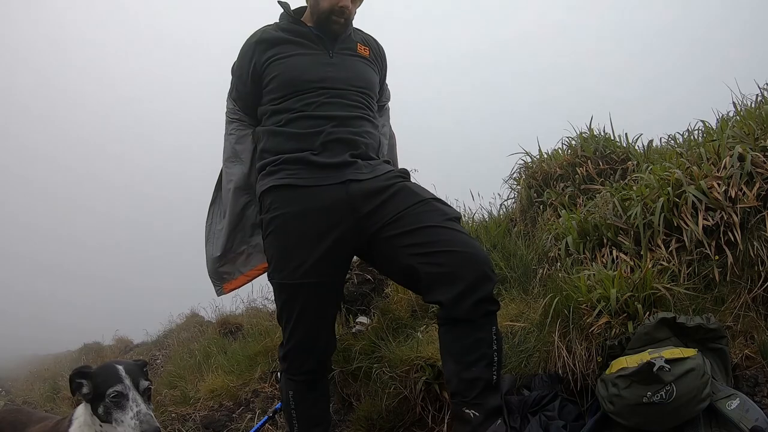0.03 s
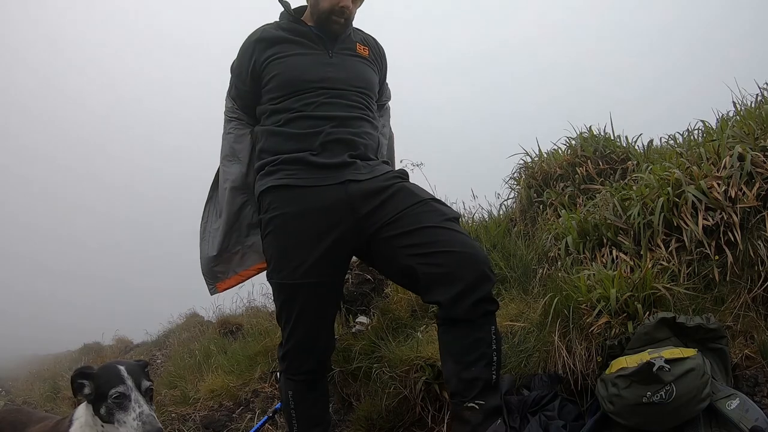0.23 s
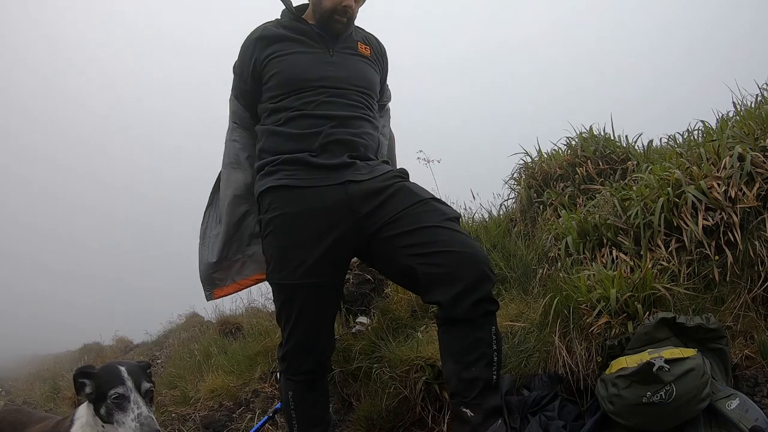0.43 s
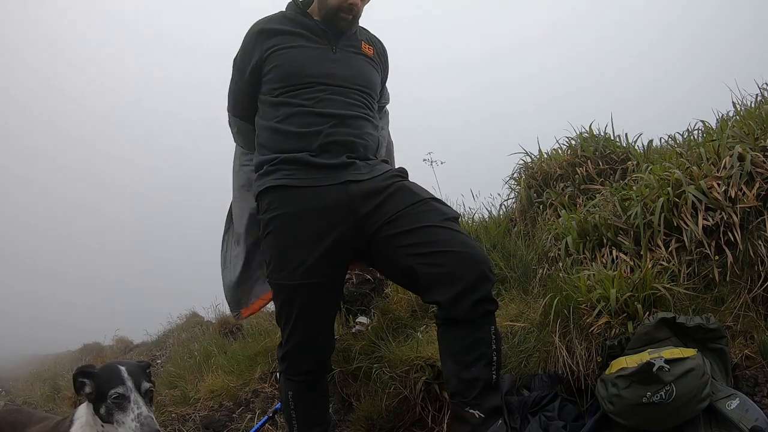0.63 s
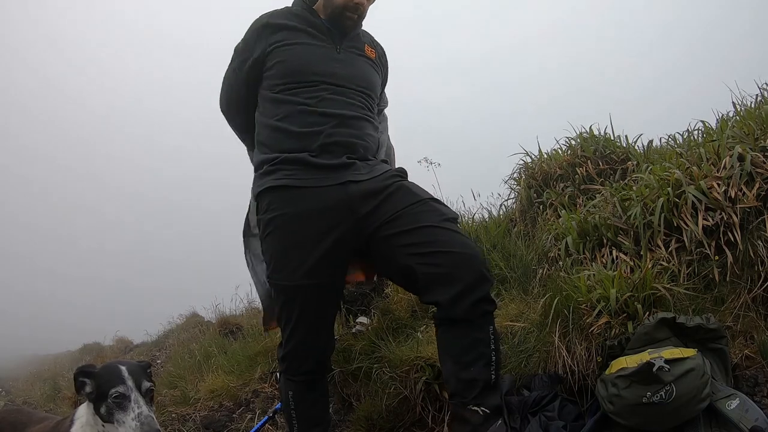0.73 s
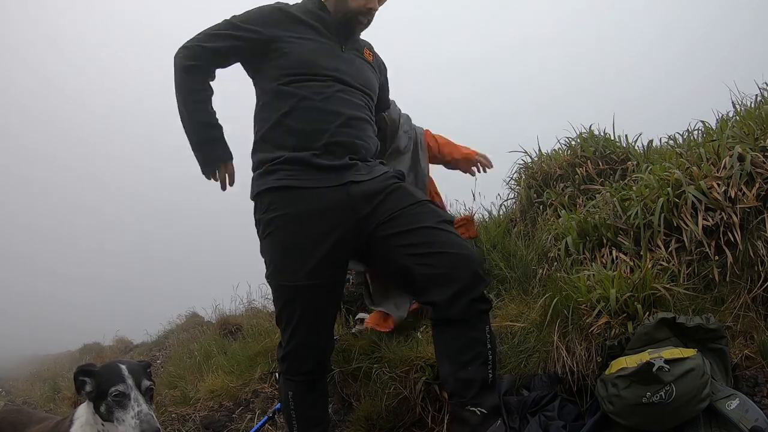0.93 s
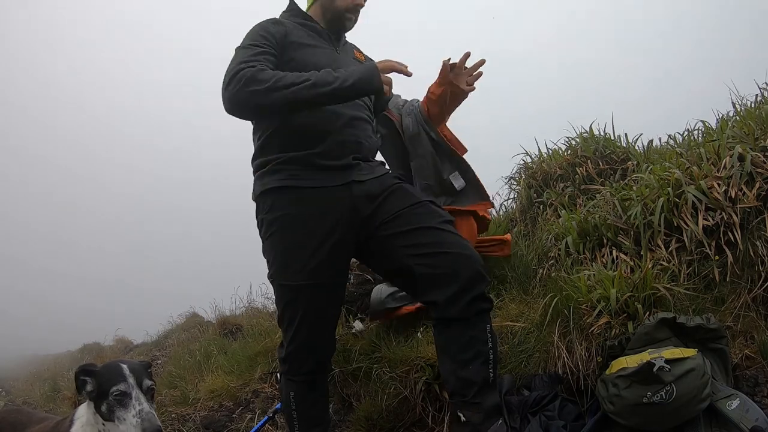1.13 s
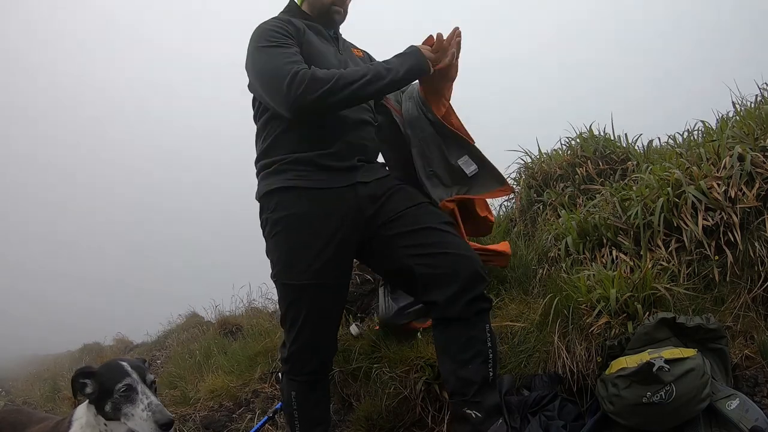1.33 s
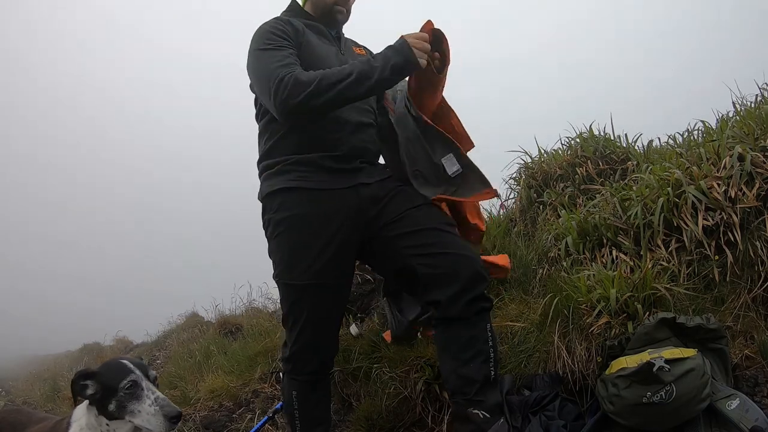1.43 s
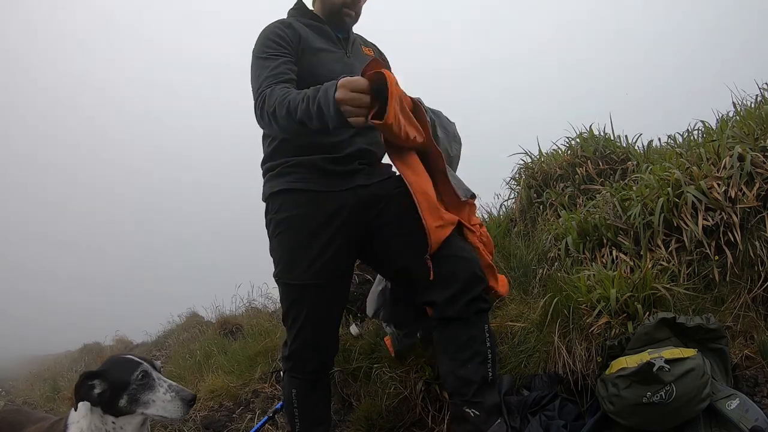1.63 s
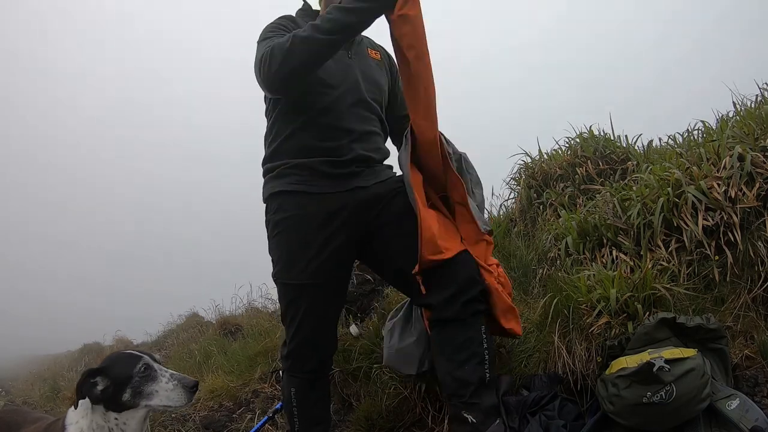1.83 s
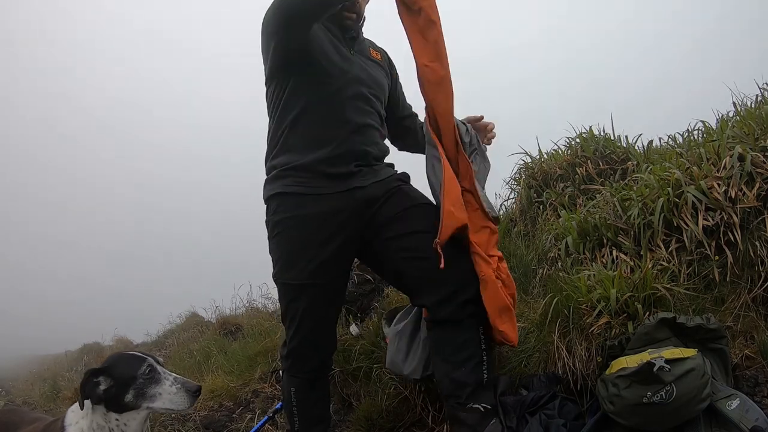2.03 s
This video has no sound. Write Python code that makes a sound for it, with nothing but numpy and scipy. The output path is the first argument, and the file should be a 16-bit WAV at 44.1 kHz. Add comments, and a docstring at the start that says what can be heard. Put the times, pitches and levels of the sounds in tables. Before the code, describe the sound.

A thin waterproof jacket is pulled off on an open hillside. Until 0.5 s there is mostly low wind thudding, stronger on the left, with faint fabric ticks. Rustling grows from 0.5 s to a sharp, bright snap at about 1.07 s, eases around 1.3 s, then crisp crinkles and sliding hiss surge at 1.5-1.75 s and 1.9-2.0 s. Faint steady wind lies beneath.

```python
"""On a windy hillside, a thin waterproof jacket is pulled off the arms.
Dense tiny clicks, given a tone colour, make the stiff fabric crinkle as it folds;
finer ones merge into the hiss of fabric sliding over the sleeves, and short rings make the snaps.
Low noise makes gusts that buffet two microphone ports, mostly the left one harder.
Steadier noise is the far wind in the grass."""
import sys
import numpy as np
from scipy import signal
from scipy.fft import rfft, irfft
from scipy.io import wavfile
from scipy.ndimage import uniform_filter1d

SR = 44100
rng = np.random.default_rng(int(sys.argv[2]) if len(sys.argv) > 2 else 0)


def inscribe(sig):
    """Save sig as 16-bit PCM at rate SR to the path in sys.argv[1].

    A 1-D sig is mono; a 2-D sig holds one channel per row.
    Samples are clipped to [-1, 1] before scaling.
    """
    pcm = np.round(np.clip(np.atleast_2d(sig).T, -1, 1) * 32767)
    wavfile.write(sys.argv[1], SR, pcm.astype(np.int16))


N = 91992   # length in samples, about 2.1 s


def from_db(db):
    """Turn a level in dB into a gain."""
    return 10 ** (np.asarray(db) / 20)


def rms_one(x):
    """Scale a sound so that its rms (average strength) is 1."""
    return x / np.sqrt(np.mean(x ** 2) + 1e-20)


def in_time(rows):
    """Glide between the rows of a table: one value per sample for each column after the time."""
    start_s, *columns = np.transpose(rows)
    time_s = np.arange(N) / SR
    return [np.interp(time_s, start_s, column) for column in columns]


def at_hz(points, edge_fall):
    """Glide between points on a log frequency scale; edge_fall is the drop per factor e outside them."""
    log_hz = np.log(np.arange(N // 2 + 1) * SR / N + 1)   # the 1 avoids the log of zero
    point_hz, value = np.transpose(points)
    log_point = np.log(point_hz)
    below = np.maximum(log_point[0] - log_hz, 0)
    above = np.maximum(log_hz - log_point[-1], 0)
    return np.interp(log_hz, log_point, value) - edge_fall * (below + above)


def coloured(x, colour):
    """Shape the spectrum with a colour table, then set the rms to 1."""
    gain = from_db(at_hz(colour, edge_fall=60))
    return rms_one(irfft(rfft(x) * gain, N))


def drift(hz):
    """Slow random wandering of rms 1: noise through two equal smoothing steps."""
    pole = np.exp(-2 * np.pi * hz / SR)
    noise = rng.standard_normal(N + SR)
    smooth = signal.lfilter([1], [1, -2 * pole, pole * pole], noise)
    return rms_one(smooth[SR:])   # skip the first second, while the filter settles


def panned(db):
    """Left and right gains; a positive difference makes the left louder."""
    return from_db([db / 2, -db / 2])


# How alike the fabric sounds at the two ports: pitch_hz, likeness (0 unrelated, 1 identical)
PORT_LIKENESS = [(60, 0.2), (110, 0.43), (200, 1), (380, 0.89), (700, 0.77), (1290, 0.59), (2380, 0.92),
                 (4400, 0.87), (8120, 0.27), (15000, 0.43)]


def grains(per_s, spread_db, clump_db):
    """Fabric moves in tiny clicks of uneven size, in clumps, partly alike at the two ports."""
    born = rng.random((2, N)) < per_s / SR
    extra_db = spread_db * np.minimum(rng.exponential(1, (2, N)), 5)
    sizes = from_db(extra_db + clump_db * drift(50.0))
    signs = rng.choice([-1, 1], (2, N))
    mid, side = rfft(born * sizes * signs)
    alike = at_hz(PORT_LIKENESS, edge_fall=0)
    # mid is the same at both ports, side is opposite
    both = np.sqrt(1 + alike) * mid + np.sqrt(1 - alike) * side * [[1], [-1]]
    return irfft(both, N)


# Folding of the fabric: start_s, level_db (of the main crinkle), deep_db and middle_db (deep and
# middle folds against the main crinkle), left_over_right_db
CRINKLE_MOVES = [(0.0, -68.5, 2, 2, 6), (0.06, -79.5, 11.5, 8, 2), (0.1, -62, 3, 2.5, 1),
                 (0.3, -78, 0.5, 6, 5.5), (0.43, -70, -2, 5, 6.5), (0.48, -57.5, 0, 1.5, 3),
                 (0.71, -54, -8.5, -3.5, 3.5), (0.75, -51, -17.5, -6.5, 4), (0.89, -58, 7.5, 3, 0.5),
                 (0.98, -49.5, -4.5, -5.5, -1.5), (1.06, -48.5, -8, 1, 0), (1.07, -35, -12, -11.5, -3),
                 (1.1, -50, -3.5, -3.5, -1.0), (1.29, -59.5, -9.5, -5, -1.5), (1.36, -60.5, -4, -2, 0),
                 (1.39, -51, -13, -11, 0.0), (1.41, -53, -5, -5, 1), (1.43, -57, -9, -2, -0.5),
                 (1.5, -46, -5, -5, 0), (1.52, -44.5, -11, -2.5, 4), (1.53, -45.5, -6, -4, -0.5),
                 (1.65, -43.5, -14, -6.5, 0.0), (1.71, -42.5, -3.5, -7.5, 0.0), (1.72, -49.5, -10, 1, 1),
                 (1.73, -43.5, 6.5, 2, 1), (1.73, -47.5, -13, -0.5, -1.0), (1.77, -52, 1, -2.5, -0.5),
                 (1.84, -53, -7.5, 3, 0.5), (1.89, -41, -7, -5, 0), (1.95, -45.5, -8.5, -2.5, -0.5),
                 (2.0, -44, -11, -5, -1.5), (2.09, -58, -2, -0.5, -2)]
# Tone of the main crinkle, the middle folds and the deep folds: pitch_hz, relative_level_db
CRINKLE_TONE = [(2200, -7.5), (2700, -1.5), (3300, 0.5), (3800, -3.5), (4500, -7), (5200, -8.5)]
MIDDLE_FOLD_TONE = [(900, -1.5), (1400, 5.5), (2200, 0.5)]
DEEP_FOLD_TONE = [(200, 4.5), (400, -1), (700, 0.5), (1000, -3)]


def crinkle():
    """Creases buckle in a dense patter; larger folds sound lower."""
    level_db, deep_db, middle_db, pan_db = in_time(CRINKLE_MOVES)
    patter = grains(per_s=4000, spread_db=1.5, clump_db=0.8)
    deep_patter = grains(per_s=1500, spread_db=2.16, clump_db=1.07)
    folds = coloured(patter, CRINKLE_TONE)
    folds = folds + from_db(middle_db) * coloured(patter, MIDDLE_FOLD_TONE)
    folds = folds + from_db(deep_db) * coloured(deep_patter, DEEP_FOLD_TONE)
    return from_db(level_db) * panned(pan_db) * folds


# Fabric sliding on fabric: start_s, level_db (of the main hiss), top_db (top treble against it)
SLIDE_MOVES = [(0.0, -78, -8.5), (0.02, -84, -15), (0.12, -73.5, -13), (0.25, -85.5, -12), (0.44, -77, -15),
               (0.52, -62.5, -15), (0.71, -63, -10), (0.76, -57, -12.5), (0.85, -68.5, -5.5),
               (0.92, -64.5, -2.5), (1.03, -55.5, -6), (1.07, -44, -10.5), (1.1, -58.5, -6.5),
               (1.18, -58, -5.5), (1.19, -69.5, 5), (1.25, -59, -11), (1.28, -68, -4), (1.35, -68, -11),
               (1.42, -51, -8), (1.43, -60.5, -8), (1.47, -55, -4), (1.5, -47, -3.5), (1.69, -47.5, -2),
               (1.76, -57.5, -2.5), (1.84, -59.5, -12), (1.87, -51, -6.5), (1.96, -47, -7),
               (2.07, -65, -4.5), (2.09, -64, -9)]
# Tone of the main hiss and of the top treble: pitch_hz, relative_level_db
SLIDE_TONE = [(2650, -24), (4500, -1.5), (5220, -7), (5670, 3), (7110, 3.5), (7910, 0), (8600, -22),
              (11200, -21), (18900, -120)]
TOP_TONE = [(4880, -34), (8300, -6), (8700, -5.5), (12300, -11.5), (14500, -19.5), (15400, -4)]


def slide():
    """The weave rubs along the sleeve: very fine grains merge into a hiss."""
    level_db, top_db = in_time(SLIDE_MOVES)
    rub = grains(per_s=9000, spread_db=1.0, clump_db=0.5)
    hiss = coloured(rub, SLIDE_TONE)
    top = from_db(top_db) * coloured(rub, TOP_TONE)
    return from_db(level_db) * (hiss + top)


def eddies(colour):
    """Low turbulence, partly shared by the ports; its own swells are partly evened so the gusts lead."""
    likeness, evenness, even_over_s = 0.41, 0.52, 0.028   # likeness and evenness run from 0 to 1
    shared = rng.standard_normal(N)
    own = rng.standard_normal((2, N))
    rumble = coloured(np.sqrt(likeness) * shared + np.sqrt(1 - likeness) * own, colour)
    span = int(even_over_s * SR)
    power = uniform_filter1d(uniform_filter1d(rumble ** 2, span), span)
    power = power + 0.024   # keeps quiet moments from being raised too far
    return rms_one(rumble / power ** (evenness / 2))


# Gusts at the ports: start_s, deep_db (deep rumble, before the overall trim), upper_db (upper rumble
# against the deep one), left_over_right_db
GUST_MOVES = [(0.0, -45.5, -4, 7.5), (0.03, -39, -8, 16.5), (0.14, -36.5, 2.5, 12.5), (0.21, -33, -4, 5),
              (0.24, -33, -8.5, 10.5), (0.29, -29.5, -8, 4.5), (0.32, -49.5, 14.5, 9), (0.35, -42, -3, 0),
              (0.38, -35.5, -10.5, 11), (0.41, -34, -6, 4), (0.45, -37.5, -20.5, 14), (0.5, -61, 3, 1),
              (0.53, -58, -10, -1), (0.64, -58.5, -9, 7), (0.7, -37.5, -24.5, 5), (0.74, -44, -28, 12),
              (0.78, -65, -10, 1), (0.83, -69, -8, -3), (0.89, -35, -0.5, 10), (0.95, -41, -4, 9),
              (0.99, -49, -12, 9.0), (1.02, -40, -20, -6), (1.05, -32.5, -24, 3), (1.08, -40, 1, 5),
              (1.12, -38, -8.5, 9.5), (1.16, -38.5, -6, 0), (1.19, -37, -15, 4), (1.22, -53, 0.5, 7),
              (1.26, -55, -10, -4), (1.29, -52, -4, 13), (1.35, -37, -15, 7.0), (1.37, -55.5, -0.5, 7.5),
              (1.42, -32.5, -11.5, 13), (1.48, -46, -5, 16), (1.5, -53, 9, 6), (1.57, -47, -20, 0),
              (1.68, -77, 1, 7), (1.73, -50, -17, 13), (1.8, -59, -17, 1), (1.85, -53.5, -5, 13),
              (1.95, -58, -6, 1), (1.98, -49, -13.5, 17), (2.04, -45, 11, 11.5), (2.09, -44, -11, 19)]
# Tone of the deep and of the upper rumble: pitch_hz, relative_level_db
DEEP_RUMBLE_TONE = [(15, -4), (45, 2), (70, -12), (90, -37.5)]
UPPER_RUMBLE_TONE = [(55, -6.5), (75, 0), (120, -5), (190, -17), (260, -31)]


def gusts():
    """Wind buffets the ports as turbulence: a deep and an upper rumble."""
    deep_db, upper_db, pan_db = in_time(GUST_MOVES)
    trim_db = -1.0
    rumble = eddies(DEEP_RUMBLE_TONE) + from_db(upper_db) * eddies(UPPER_RUMBLE_TONE)
    return from_db(deep_db + trim_db) * panned(pan_db) * rumble


# Tone of the far wind in the grass: pitch_hz, relative_level_db
AIR_TONE = [(125, -29), (150, 2), (185, 4), (250, -5.5), (700, -16), (1500, -10.5), (2500, -18),
            (5000, -30), (9000, -32), (13000, -68)]


def air():
    """Far wind in the grass: a wash of noise, partly shared by the ports, whose level wanders a little."""
    shared = rng.standard_normal(N)
    own = rng.standard_normal((2, N))
    level_db = -58.5 + 1.1 * drift(2.4)
    return from_db(level_db) * coloured(0.6 * shared + own, AIR_TONE)


# Single creases snapping: start_s, level_db, pitch_hz, ring_cycles (under 2 counts as 2),
# left_over_right_db
SNAP_EVENTS = [(0.0677, -44, 1170, 7.1, 5), (.090, -40, 520, 4.7, 1), (0.408, -44.5, 1440, 6.5, 8),
               (.675, -46, 800, 5, 3), (.725, -39, 1860, 7, 3), (0.985, -32.5, 2130, 4, 3),
               (1.031, -39, 2200, 5.1, 1), (1.047, -31, 3500, 3.6, -5), (1.0615, -24, 2830, 3.5, -2),
               (1.071, -33, 2620, 2.7, -1), (1.0728, -17, 3000, 2.7, 1), (1.0758, -25.5, 3050, 6.6, -1),
               (1.078, -45, 3160, 2.5, -2), (1.082, -30, 2960, 18, -1), (1.172, -40, 1720, 8.1, 0),
               (1.2546, -35.5, 1570, 6.6, -3.5), (1.368, -29.5, 1400, 3, -4), (1.387, -33, 2300, 4.3, 3),
               (1.480, -32.5, 1610, 2.6, 0), (1.755, -31, 2500, 3, 0), (1.414, -43.5, 720, 4, 0),
               (1.515, -24.5, 2580, 5.6, -2), (1.7241, -24, 1410, 3.4, -1), (1.7292, -32, 3000, 6.9, 2),
               (1.8105, -30, 2050, 2.9, 2), (1.813, -36, 1300, 3.4, 4), (1.841, -29, 2100, 1.8, 0),
               (1.848, -35, 2400, 3.6, -6), (1.8568, -31, 1180, 4.3, 2), (1.882, -19.5, 2340, 1.3, 2.5),
               (1.988, -31.5, 990, 3.8, -4), (2.015, -30.5, 1290, 4.6, 0)]


def snaps():
    """Each crease rings for a few cycles that swell at once and die, with a short rough crack."""
    length = 900   # samples per snap, about 20 ms
    crack_decay_s, crack_db = 0.0052, -17.5
    out = np.zeros((2, N + length))
    t = np.arange(length) / SR
    crack_band = signal.butter(2, [700, 6000], "band", fs=SR, output="sos")
    for start_s, level_db, pitch_hz, ring_cycles, pan_db in SNAP_EVENTS:
        noise = rng.standard_normal(length)
        crack = signal.sosfilt(crack_band, noise) * np.exp(-t / crack_decay_s)
        # the ring has almost gone at age 9.14, after ring_cycles cycles
        age = t * pitch_hz * 9.14 / max(ring_cycles, 2)
        swell = 1.43 * age ** 2 * np.exp(-age)
        ring = swell * np.sin(2 * np.pi * pitch_hz * t)
        snap = ring + from_db(crack_db) * crack
        i = int(start_s * SR)
        out[:, i:i + length] += from_db(level_db) * panned(pan_db)[:, None] * snap
    return out[:, :N]


def scene():
    """Add up all the sources at the two ports."""
    return crinkle() + slide() + gusts() + air() + snaps()


def record(dry):
    """Cut the very top of the treble steeply, above 15900 Hz and down by 70 dB."""
    top_cut = signal.cheby2(12, 70, 15900, fs=SR, output="sos")
    return signal.sosfilt(top_cut, dry)


dry = scene()
out = record(dry)
inscribe(out)
```